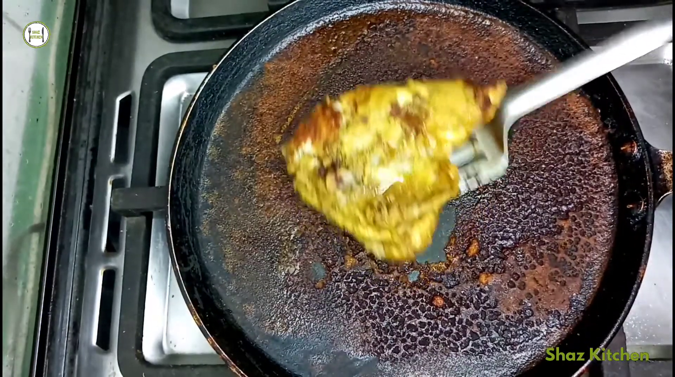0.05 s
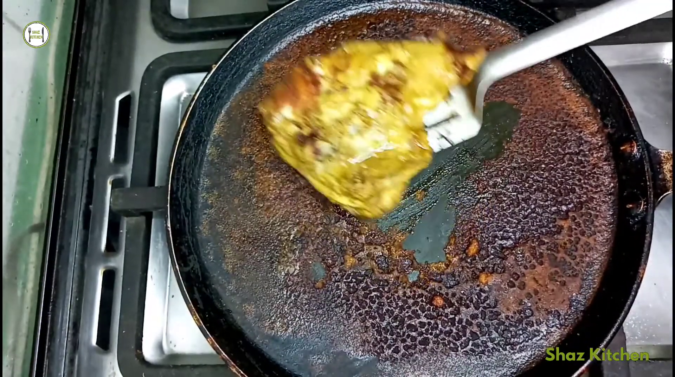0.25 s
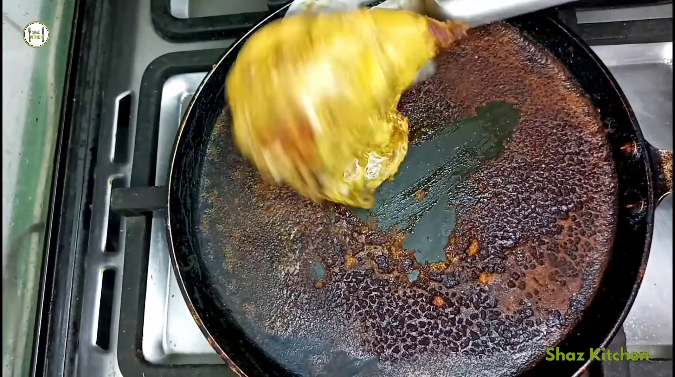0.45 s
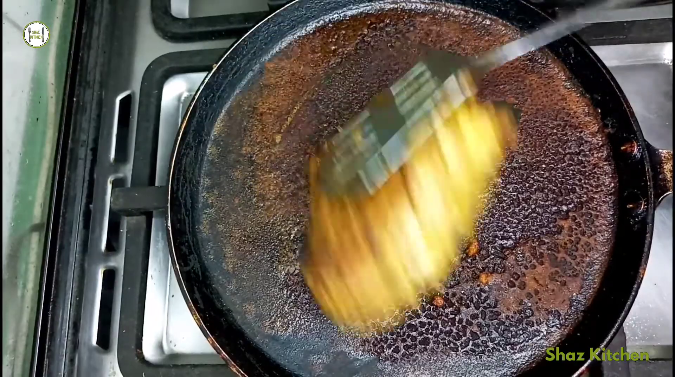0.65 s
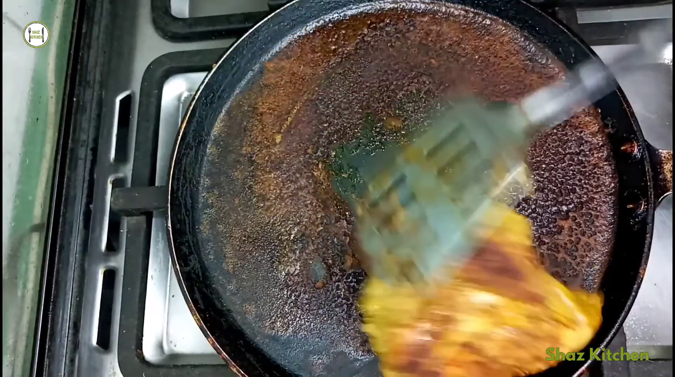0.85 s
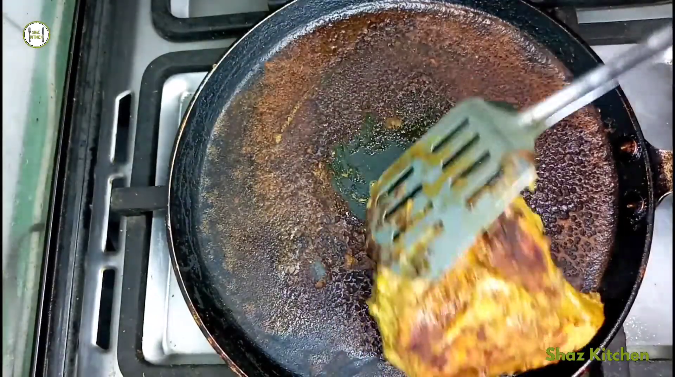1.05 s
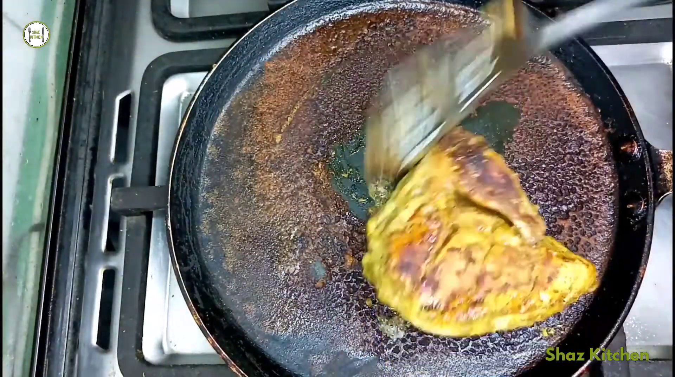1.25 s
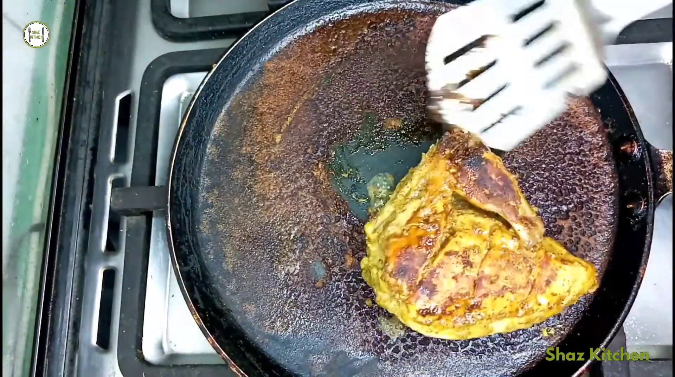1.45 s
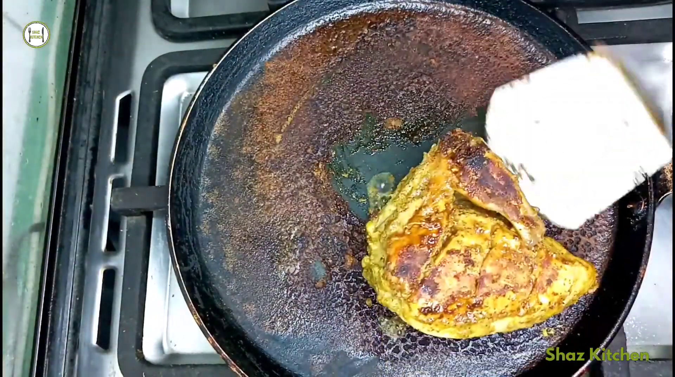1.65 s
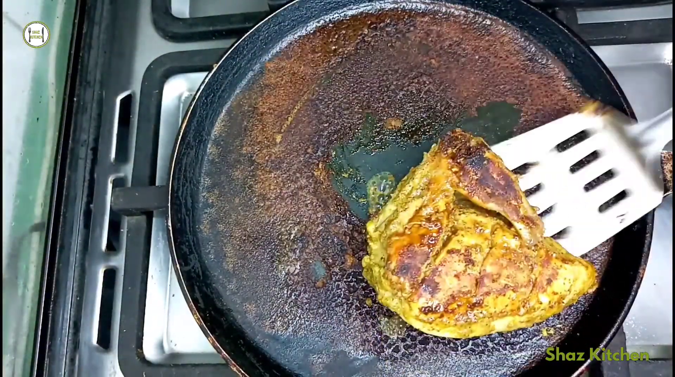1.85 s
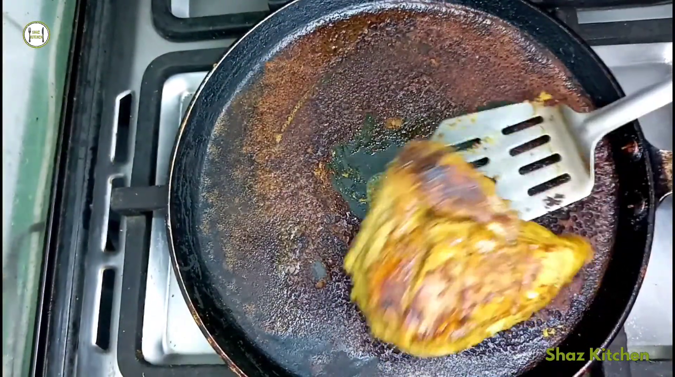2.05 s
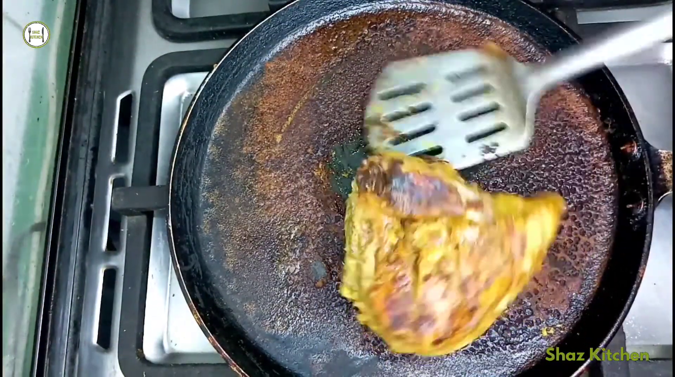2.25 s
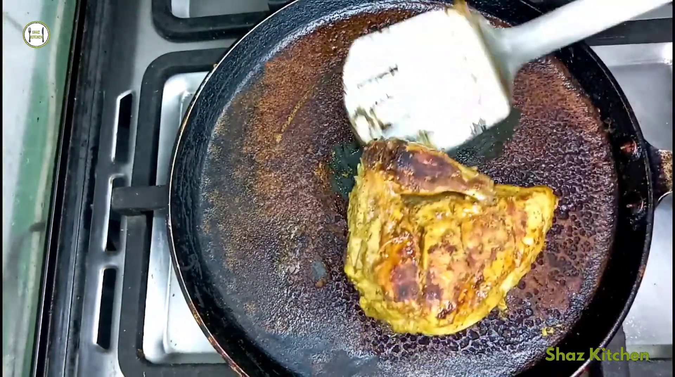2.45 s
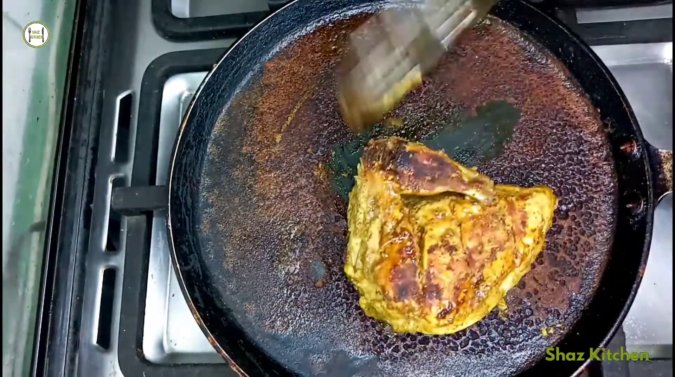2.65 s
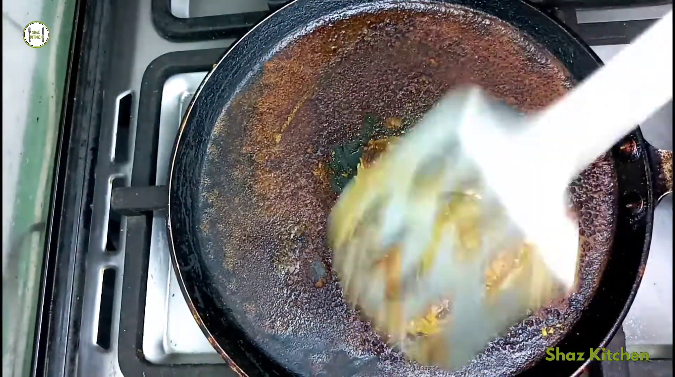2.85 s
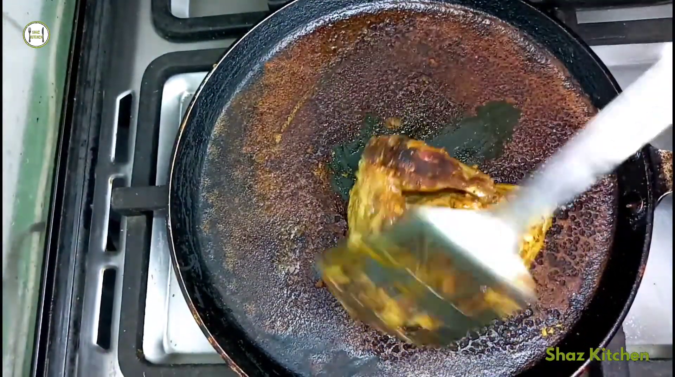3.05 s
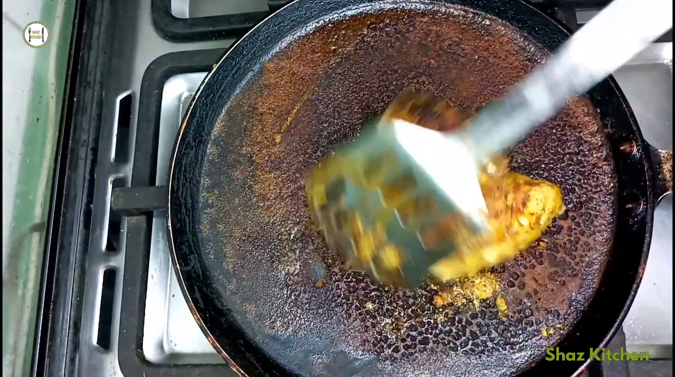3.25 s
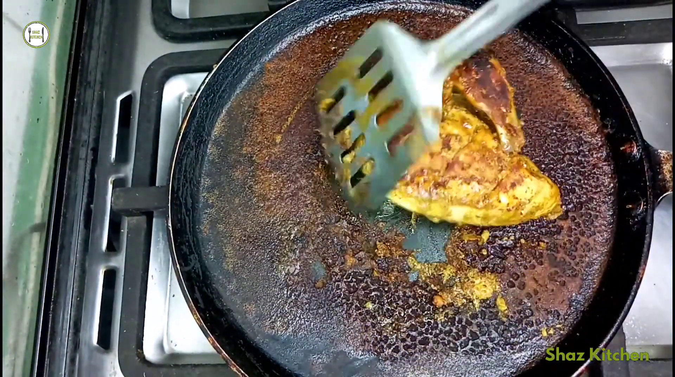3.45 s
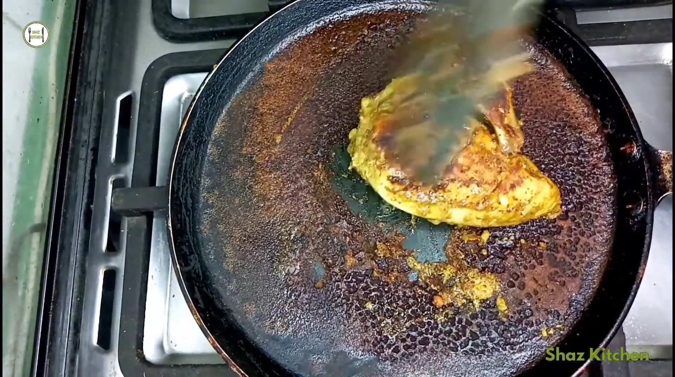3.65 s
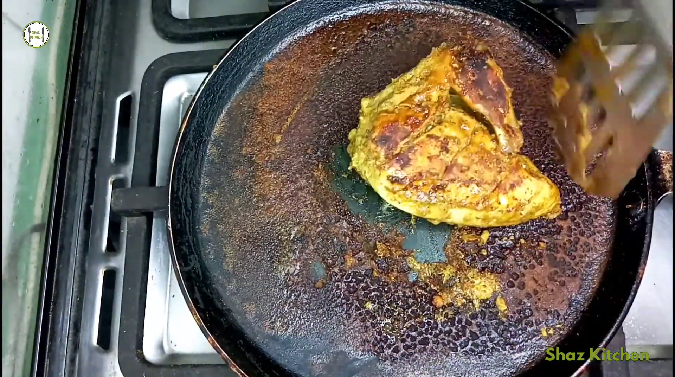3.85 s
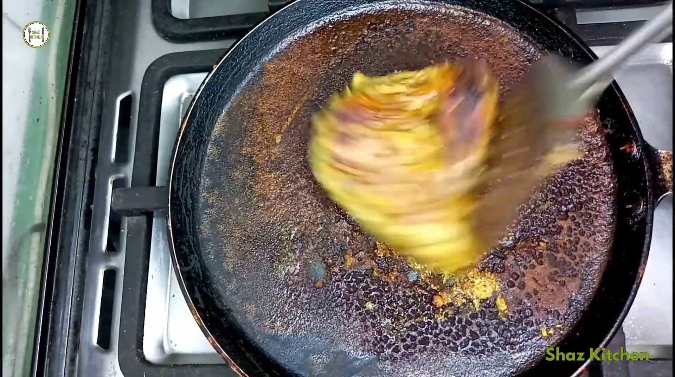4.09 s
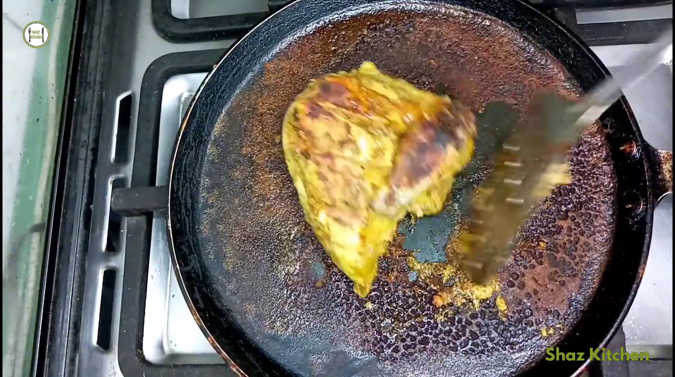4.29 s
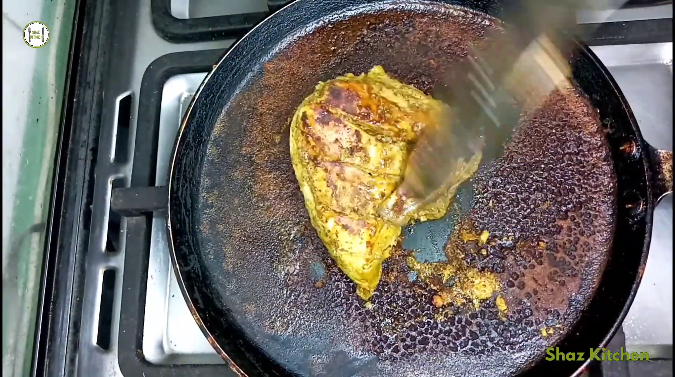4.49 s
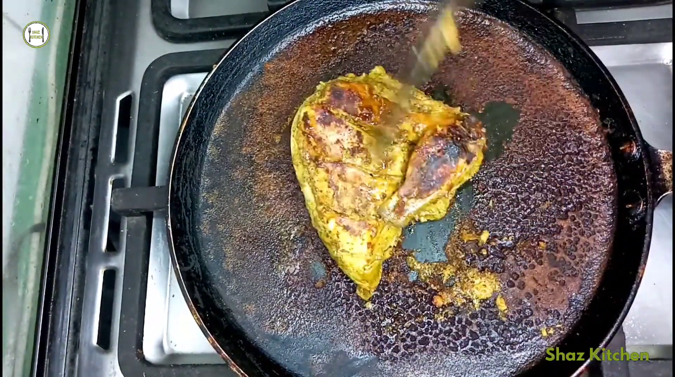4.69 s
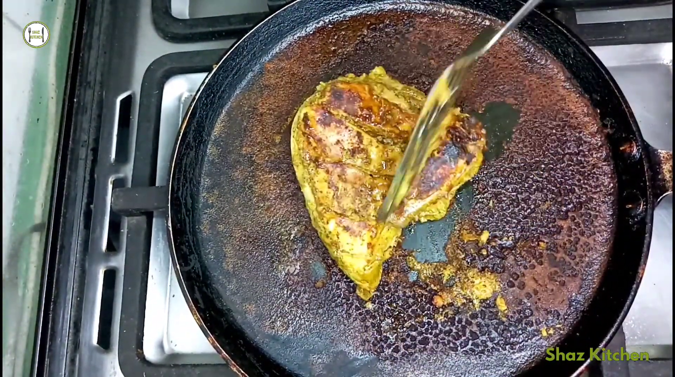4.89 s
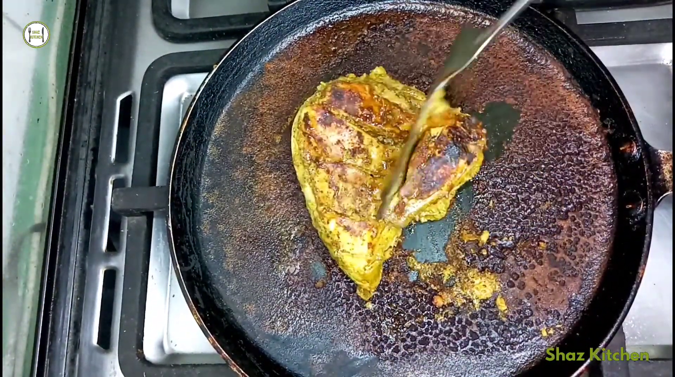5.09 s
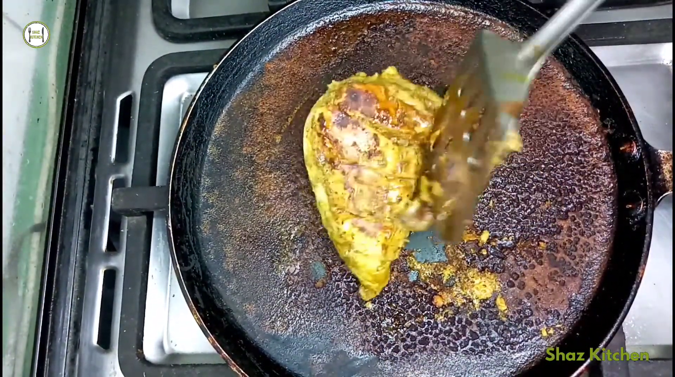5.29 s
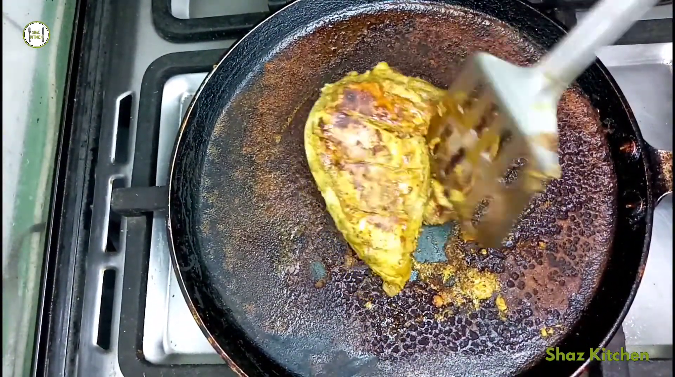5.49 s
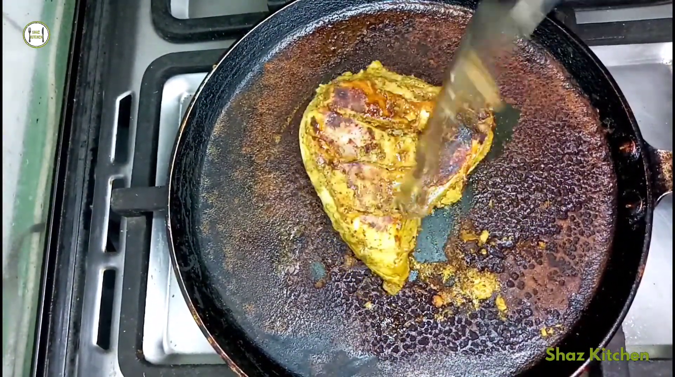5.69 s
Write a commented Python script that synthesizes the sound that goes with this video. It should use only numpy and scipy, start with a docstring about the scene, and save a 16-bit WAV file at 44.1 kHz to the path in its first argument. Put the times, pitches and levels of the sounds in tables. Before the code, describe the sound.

In a small kitchen, thin oil hisses quietly on a bare iron pan over a low wavering fan hum. Meat lands, and the sizzle leaps up, dense and bright, with steam beneath. A spatula knocks the pan, once hard, then squeaks briefly. Droplets spit while the frying slowly softens. Close microphone, short room reflections.

```python
"""Chicken is flipped on a flat iron pan. At first oil hisses on bare iron (coloured noise) over fan noise
(wavering tones, rumble, airy noise); spatula knocks (ringing modes) and spits (short pitched puffs) begin.
At 0.78 s the meat lands: dense fizz and deeper steam (noise roughened by bursts), with narrow resonant hisses;
the airy noise is turned down just after, then back up by a level curve.
The hardest knock comes at 1.7 s, a squeak (gliding tone) at 2.25 s; frying goes on."""
import sys
import numpy as np
from scipy import signal
from scipy.fft import rfft, irfft, next_fast_len
from scipy.io import wavfile
from scipy.ndimage import uniform_filter1d, map_coordinates

SR = 44100
rng = np.random.default_rng(int(sys.argv[2]) if len(sys.argv) > 2 else 0)


def inscribe(sig):
    """Save sig as 16-bit PCM at rate SR to the path in sys.argv[1].

    A 1-D sig is mono; a 2-D sig holds one channel per row.
    Samples are clipped to [-1, 1] before scaling.
    """
    pcm = np.round(np.clip(np.atleast_2d(sig).T, -1, 1) * 32767)
    wavfile.write(sys.argv[1], SR, pcm.astype(np.int16))


N = 252693


def amp(db):
    """dB to amplitude factor."""
    return 10 ** (np.asarray(db) / 20)


def unit(x):
    """x at rms 1."""
    return x / np.sqrt(np.mean(x ** 2) + 1e-20)


def curves(rows):
    """One value per sample for each column after the time."""
    time_s, *columns = np.transpose(rows)
    return [np.interp(np.arange(N) / SR, time_s, column) for column in columns]


def peaks(rows, rise_s, fall_s):
    """dB curve of (peak_s, height_db) events that rise and fall in straight lines."""
    t = np.arange(N) / SR
    return sum(db * np.interp(t, [s - rise_s, s, s + fall_s], [0, 1, 0]) for s, db in rows)


def wobble(rate_hz):
    """A smooth random curve, rate_hz knots a second."""
    knots = rng.standard_normal(int(N * rate_hz / SR) + 4)
    return map_coordinates(knots, [np.arange(N) * rate_hz / SR])


def filtered(x, response):
    """x times a response of frequency."""
    m = next_fast_len(N + 8192)
    return irfft(rfft(x, m) * response(np.fft.rfftfreq(m, 1 / SR)), m)[..., :N]


def above(x, corner_hz):
    """A steep high-pass, halved in amplitude at the corner."""
    return filtered(x, lambda hz: hz ** 6 / (hz ** 6 + corner_hz ** 6))


def coloured(x, points):
    """x shaped by (freq_hz, density_db) points, joined on a log frequency axis, at rms 1."""
    freq_hz, db = np.transpose(points)
    return unit(filtered(x, lambda hz: amp(np.interp(np.log(hz + 1), np.log(freq_hz + 1), db))))


def patchy_noise(patchy_db, streak_db=2.5):
    """White noise whose gain drifts in short wide patches and in long narrow streaks."""
    z = signal.stft(rng.standard_normal(N), nperseg=512)[2]

    def field(bins, frames):
        smooth = uniform_filter1d(rng.standard_normal(z.shape), bins, 0)
        return unit(uniform_filter1d(smooth, frames, 1))

    gain_db = patchy_db * field(6, 8) + streak_db * field(2, 50)
    return unit(signal.istft(z * amp(gain_db), nperseg=512)[1][:N])


def bursts(rate_hz, spread_db, decay_s):
    """Random bubble bursts as an envelope: sharp rise, exponential decay, a few much larger."""
    when, size = rng.random((2, 40000))
    keep = np.arange(40000) < rate_hz * N / SR
    heights = (1 - size) ** (-spread_db * np.log(10) / 20)
    spikes = np.bincount((when * N).astype(int), keep * heights, N)
    return unit(signal.lfilter([1], [1, -np.exp(-1 / (decay_s * SR))], spikes))


# oil on bare iron while the meat is lifted: (time_s, level_db)
LIFT_LEVELS = [(0.0, -33.5), (0.088, -42), (0.136, -41), (0.196, -35), (0.242, -40), (0.4, -40.5),
               (0.542, -34.5), (0.59, -42.5), (0.785, -41.5)]
# its colour: (freq_hz, density_db)
BARE_COLOUR = [(530, -49), (900, -8.5), (1600, -10), (1990, -10), (2660, -5), (2930, -10), (3190, -6),
               (3380, -10), (7400, -3), (8150, -8), (11700, -8.5), (12900, -18), (14900, -3), (16000, -27)]


def bare_oil(crackle):
    """Oil on bare iron: coloured noise roughened by bursting bubbles."""
    noise = patchy_noise(patchy_db=0.0, streak_db=2.0)
    level_db, = curves(LIFT_LEVELS)
    return amp(level_db) * coloured(noise * (1.7 + crackle), BARE_COLOUR)


# frying under way: (time_s, level_db, steam_re_fizz_db)
FRY_LEVELS = [(0.8, -32, -8), (0.86, -22.5, -12), (0.93, -25.5, -9.5), (1, -24.5, -12),
              (1.23, -26.5, -11.5), (1.55, -26, -14.5), (2.1, -27.5, -10.5), (2.31, -25.5, -10.5),
              (2.45, -27, -9), (2.85, -28, -10), (3.34, -27, -9.5), (3.85, -29, -7.5), (4.03, -28, -8),
              (4.45, -29, -7.5), (4.75, -30, -7), (5.73, -30, -7.5)]
# brief dips of the sizzle: (dip_s, depth_db)
LULL_DIPS = [(1.28, 2.5), (1.61, 1.5), (1.735, 4.5), (1.855, 2.5), (2.785, 6.5), (2.89, 5.5), (3.4, 3),
             (3.49, 4.5), (3.668, 2), (3.97, 2.5), (4.565, 2.5), (4.65, 2.5), (5.345, 3.5)]
LULL_FALL_S, LULL_RISE_S = 0.033, 0.036
LAND_S, LAND_TAKES_S = 0.779, 0.025


def frying():
    """Bare oil gives way to frying meat as it lands; the boiling surges in all layers at once."""
    level_db, steam_db = curves(FRY_LEVELS)
    level_db = level_db - peaks(LULL_DIPS, LULL_FALL_S, LULL_RISE_S)
    landed = np.interp(np.arange(N) / SR, [LAND_S, LAND_S + LAND_TAKES_S], [0, 1])
    surge_db = 0.21 * wobble(30) + 0.84 * wobble(90)
    crackle = bursts(rate_hz=1500, spread_db=1.0, decay_s=0.00082)
    gulps = bursts(rate_hz=330, spread_db=2.5, decay_s=0.0071)
    meat = fizz(crackle) + steam(steam_db, crackle, gulps) + pockets(0.95 + gulps)
    return amp(surge_db) * (landed * amp(level_db) * meat + (1 - landed) * bare_oil(crackle))


# gain curve of the airy noise, dips included: (time_s, relative_level_db)
AIR_LEVELS = [(0.0, -56.5), (0.27, -60.5), (0.6, -55), (0.79, -59.5), (0.84, -68), (1.16, -70), (1.22, -51),
              (1.4, -56), (1.98, -54), (2.08, -61), (2.41, -64), (2.65, -59.5), (3.02, -59.5),
              (3.51, -57.5), (3.86, -60), (4.3, -53.5), (4.56, -58), (5.73, -59)]
# blade tones: (freq_hz, relative_level_db, unsteadiness_hz)
BLADE_TONES = [(74, -29, 6.7), (100, -1.5, 3.006), (124.2, -8, 5), (146.4, -3.5, 3.3), (196.7, -7, 1.515),
               (404.4, -22.5, 1.294)]
# rumble colour: (freq_hz, density_db)
RUMBLE_COLOUR = [(12, -55), (20, -16), (38, -32.5), (76, -2.5), (113, 1), (171, -9.5), (206, -10.5),
                 (330, -20.5), (430, -58), (730, -120)]
# air colour: (freq_hz, density_db)
AIR_COLOUR = [(120, -28), (200, 0), (227, -14.5), (318, -13.5), (361, -17.5), (393, -11.5), (427, -13),
              (685, -17), (875, -17), (1500, -14), (1950, -12.5), (3300, -120)]
DRONE_DB = -44.5  # mean level of the tones, and of the rumble
DRONE_FOLLOWS = 0.18  # share of the air curve's dB swings applied to the drone


def fan():
    """Blade tones waver in strength and phase over rumble and airy noise; a level curve scales them."""
    t = np.arange(N) / SR
    air_db, = curves(AIR_LEVELS)
    drone_db = DRONE_DB + DRONE_FOLLOWS * (air_db - air_db.mean())
    tones = np.zeros(N)
    for hz, db, rate_hz in BLADE_TONES:
        strength = amp(db + 2.2 * wobble(rate_hz))
        tones += strength * np.sin(2 * np.pi * hz * t + 1.44 * wobble(rate_hz))
    drone = unit(tones) + coloured(patchy_noise(patchy_db=2.0), RUMBLE_COLOUR)
    air = coloured(patchy_noise(patchy_db=2.5), AIR_COLOUR)
    return amp(drone_db) * drone + amp(air_db + 7) * air


# spatula on pan: (start_s, relative_level_db, upper_modes_db)
KNOCK_EVENTS = [(0.174, -46.5, 3.5), (0.519, -41, -23), (1.279, -36, -9), (1.459, -42, -10),
                (1.707, -19, -5), (2.755, -44, 3), (3.369, -46, 7.5), (4.039, -42.5, 4),
                (4.468, -33.5, -5.5), (5.169, -34, -14)]
# ringing modes of the pan: (freq_hz, relative_level_db, t60_s)
PAN_MODES = [(204.4, -3.5, 0.44), (215.8, -0.5, 0.21), (245, -7, 0.37), (286, -13, 0.17), (492, -12, 0.14),
             (536, -11.5, 0.33), (820, 2.5, 0.066), (890, -15, 0.54), (1074, -13, 0.057), (1183, -12, 0.26),
             (1716, -3.5, 0.039), (3530, -4, 0.11), (5400, -12, .03)]


def spatula():
    """Knocks ring the pan: edge blows stir the upper modes more, low modes answer as it rocks on the grate."""
    out, t = np.zeros(N + SR), np.arange(SR // 2) / SR
    scatter_db = rng.normal(0, 1.34, (len(KNOCK_EVENTS), len(PAN_MODES)))
    rattles = rng.standard_normal((len(KNOCK_EVENTS), len(t)))
    buzz_band = signal.butter(2, [250, 1300], "band", fs=SR)
    for (s, db, upper_db), row_db, rattle in zip(KNOCK_EVENTS, scatter_db, rattles):
        for (hz, mode_db, t60_s), chance_db in zip(PAN_MODES, row_db):
            upper = hz > 400
            late_s = 0 if upper else 0.009
            stir_db = upper_db + 0.5 if upper else -2.5
            rise = 1 - np.exp(-t * hz / 1.2)  # the plate takes part of a cycle to swing up
            gain = amp(db + stir_db + mode_db + chance_db - 60 * t / t60_s)
            out[round((s + late_s) * SR):][:len(t)] += gain * rise * np.sin(2 * np.pi * hz * t)
        grate_buzz = unit(signal.lfilter(*buzz_band, rattle))
        steel_clack = above(np.pad(rattle, (0, N)), corner_hz=1500)[:len(t)]
        hit = out[round(s * SR):][:len(t)]  # a view: adding here adds to out
        hit += amp(db + upper_db - 17 - 60 * t / 0.69) * grate_buzz
        hit += amp(db + upper_db + 5 - 60 * t / 0.04) * steel_clack
    return out[:N]


# droplets: (start_s, relative_level_db, pitch_hz, relative_plop_db)
SPIT_EVENTS = [(0.3883, -19, 6000, -36), (0.4369, -27, 7400, -29), (0.5328, -23, 7600, -29),
               (0.692, -27, 7450, -23), (0.8764, -20, 6070, -17), (0.9594, -19, 8000, -25),
               (1.4798, -13, 10500, -24), (2.294, -13, 7500, -15), (2.7758, -13.5, 7270, -21),
               (2.876, -15, 11040, -24), (2.9297, -17, 10900, -23), (3.6323, -16.5, 5470, -9),
               (3.6833, -13, 7500, -7), (3.7704, -26, 7640, -22), (3.8516, -15, 11100, -16),
               (4.1314, -16, 6660, -27), (4.2424, -16, 6690, -24), (4.4664, -20, 6500, -8),
               (4.545, -21, 6520, -6), (4.583, -17, 6600, -12), (4.6254, -17, 6740, -11),
               (4.6972, -17, 7330, -18), (4.7274, -25.5, 7900, 1), (4.7514, -23, 6770, -3),
               (4.8868, -16, 6320, -22), (5.2589, -17, 7600, -13), (5.5682, -19.5, 6030, -2.5)]


def spits():
    """Each water droplet explodes in the oil: a puff of a few ms with a pitched centre and a lower plop."""
    out, t = np.zeros(N + SR), np.arange(SR // 50) / SR
    snaps = rng.standard_normal((len(SPIT_EVENTS), len(t)))

    def puff(rise_s):
        return t / rise_s * np.exp(1 - t / rise_s)

    for (s, db, hz, plop_db), snap in zip(SPIT_EVENTS, snaps):
        centre = 0.5 * np.sin(2 * np.pi * hz * t) + 0.34 * snap
        plop = amp(plop_db) * np.sin(2 * np.pi * 2100 * t)
        burst = puff(rise_s=0.00066) * centre + puff(rise_s=0.00061) * plop
        out[round(s * SR):][:len(t)] += amp(db) * burst
    return above(out[:N], corner_hz=900)


# bursting bubbles: (freq_hz, density_db)
FIZZ_COLOUR = [(1470, -30.5), (2500, -9), (3110, -11), (3410, -5.5), (3800, -10), (4170, -4.5),
               (4690, -11.5), (5560, -2.5), (7420, 0), (8530, -6), (9510, -7), (11000, -2.5), (13500, -16),
               (14900, -2), (16000, -10.5)]


def fizz(crackle):
    """Bubbles bursting in thin oil: bright noise roughened by the bursts."""
    noise = patchy_noise(patchy_db=1.0, streak_db=2.0)
    return amp(-0.44) * coloured(noise * (2.7 + crackle), FIZZ_COLOUR)


# steam escaping under the meat: (freq_hz, density_db)
STEAM_COLOUR = [(350, -39), (600, -7), (674, -40), (768, -11.5), (876, -5), (1080, -11), (1550, -7),
                (1680, -10), (2030, -0.5), (2970, -8.5), (3130, -22), (3540, -11.5), (3800, -10),
                (4940, -7.5), (8360, -120)]
# steam puffs out, or sinks where negative: (peak_s, change_db)
STEAM_PUFFS = [(1.72, 10.5), (1.85, 10), (2.28, -5), (2.76, 4), (2.92, 2), (3.38, 7), (4.57, 4),
               (4.65, 1.5)]
PUFF_RISE_S, PUFF_FALL_S = 0.02, 0.03


def steam(level_db, crackle, gulps):
    """Steam escapes in gulps under the meat; its deeper part builds once the meat lies flat."""
    t = np.arange(N) / SR
    noise = patchy_noise(patchy_db=0.0, streak_db=1.44)
    hiss = coloured(noise * (1.4 + 0.41 * crackle + 0.63 * gulps), STEAM_COLOUR)
    seated = np.interp(t, [0.95, 1.5], [0.3, 1])
    hiss = seated * hiss + (1 - seated) * above(hiss, corner_hz=1880)
    level_db = level_db + peaks(STEAM_PUFFS, PUFF_RISE_S, PUFF_FALL_S)
    return amp(level_db - 1.5 + 0.2 * wobble(43)) * hiss


# narrow hisses, perhaps steam pockets under the meat: (start_s, end_s, pitch_hz, relative_level_db)
POCKET_HISSES = [(0.787, 0.92, 5890, -12), (.79, .93, 7360, -14), (0.78, 0.963, 4360, -14),
                 (.9, 3.46, 3430, -30.5), (1.102, 1.28, 4320, -15), (1.2, 2.19, 10940, -16.5),
                 (1.9, 2.382, 7330, -10), (2.043, 2.298, 4220, -11.5), (2.298, 3.932, 2040, -19),
                 (2.4, 3.27, 10800, -12.5), (2.416, 4.14, 2363, -15), (2.5, 3.464, 2850, -22),
                 (2.953, 3.26, 6400, -13), (3.05, 4.29, 5230, -15.5), (3.55, 4.24, 7420, -12),
                 (3.7, 4., 11160, -14), (4.3, 5.77, 2092, -13.5), (4.55, 5.64, 1834, -20),
                 (4.7, 5.34, 6800, -11.5)]
POCKET_WIDTH = 0.065  # width over pitch of each of two stacked resonances


def pockets(boil):
    """Each pocket is a narrow resonance blown by the boiling, swelling in and out."""
    out, t = np.zeros(N), np.arange(N) / SR
    for start_s, end_s, hz, db in POCKET_HISSES:
        width_hz = POCKET_WIDTH * hz

        def resonance(f):
            return (f * width_hz / (hz * hz - f * f + 1j * f * width_hz)) ** 2

        ramp_s = 0.18 * (end_s - start_s)
        swell = np.clip(np.minimum(t - start_s, end_s - t) / ramp_s, 0, 1)
        tone = filtered(boil * rng.standard_normal(N), resonance)
        out += amp(db) * swell * unit(tone)
    return out


# the blade slides on the iron: (start_s, end_s)
SLIDE_S = (2.245, 2.33)
SQUEAK_HZ, SQUEAK_DB = (1400, 2050), -40  # pitch from, to; level before roughening


def squeak():
    """A rough tone that glides up as the blade slides."""
    start_s, end_s = SLIDE_S
    t = np.arange(N) / SR
    swell = np.interp(t, [start_s, (start_s + end_s) / 2, end_s], [0, 1, 0])
    phase = 2 * np.pi * np.cumsum(np.interp(t, SLIDE_S, SQUEAK_HZ)) / SR
    rough = wobble(250) * np.sin(phase) + wobble(250) * np.cos(phase)
    return amp(SQUEAK_DB) * swell * rough


def kitchen(x):
    """Nearby walls and the stove top answer with a short diffuse tail."""
    t = np.arange(SR // 3) / SR
    tail = rng.standard_normal(len(t)) * amp(-60 * t / 0.16) * (t > 0.002)  # t60 0.16 s
    return signal.fftconvolve(x, tail / np.linalg.norm(tail))[:N]


def scene():
    """Pan sounds with their reflections, and the fan."""
    pan = above(frying(), corner_hz=746) + spits() + spatula() + squeak()
    walls_db = -14
    return (pan + amp(walls_db) * kitchen(pan) + fan())[None]


TOP_HZ = 15560


def record(dry):
    """Brick-wall low-pass at the band limit."""
    return filtered(dry, lambda hz: hz < TOP_HZ)


dry = scene()
out = record(dry)
inscribe(out)
```